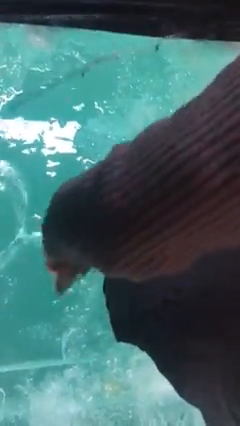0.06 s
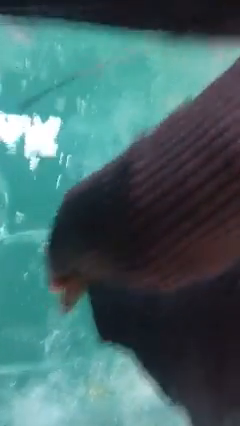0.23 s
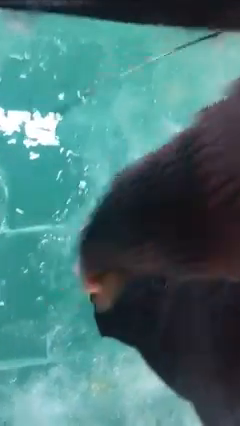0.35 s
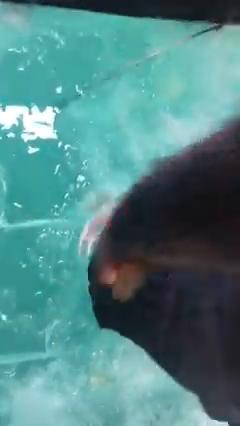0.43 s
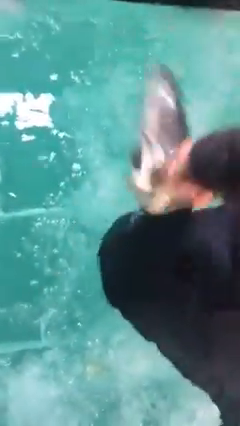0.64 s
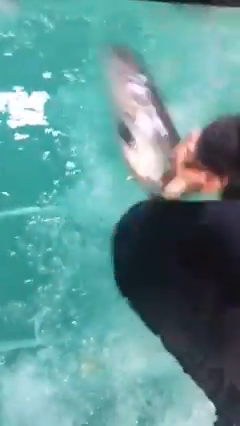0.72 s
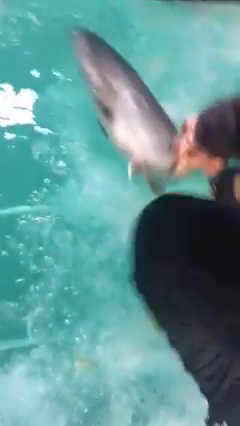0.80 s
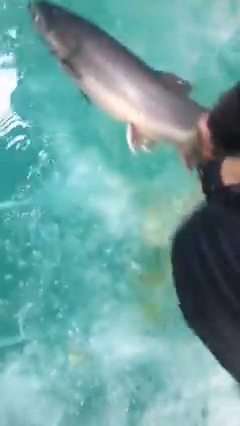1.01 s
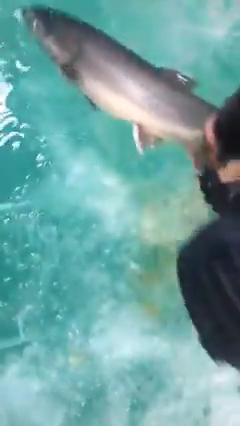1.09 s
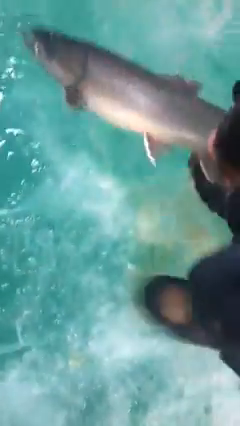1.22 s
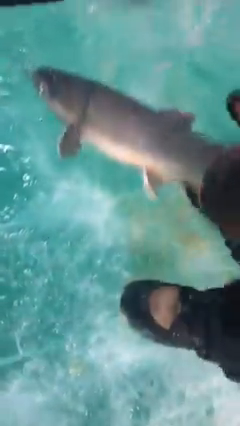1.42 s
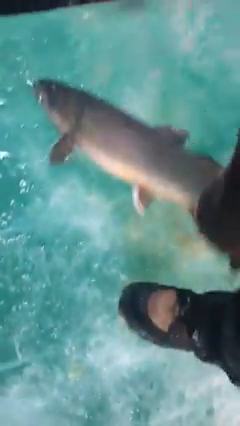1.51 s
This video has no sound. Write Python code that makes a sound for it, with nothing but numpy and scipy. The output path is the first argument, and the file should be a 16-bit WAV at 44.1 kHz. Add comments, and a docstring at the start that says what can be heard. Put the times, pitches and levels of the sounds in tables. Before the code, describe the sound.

A dead, wet thump of a fish laid on ice, amid soft clothing rustle.

```python
"""A fish is swung out and laid on lake ice, close by in the open air.
From the start, moving arms and legs give soft bumps and a dull rustle over faint hiss.
A quarter second in, after a tiny tick, comes one dead, low thump with a wet slap,
then a weaker knock and a short scuff, with no ring and no echo.
The body moves on, with more soft bumps, hollow rubs and thin swishes of fabric."""
import sys
import numpy as np
from scipy import signal
from scipy.fft import rfft, irfft
from scipy.io import wavfile
from scipy.ndimage import uniform_filter1d

SR = 44100
rng = np.random.default_rng(int(sys.argv[2]) if len(sys.argv) > 2 else 0)


def int16_out(signal):
    """Quantize to a 16-bit WAV file."""
    q = np.round(np.clip(np.atleast_2d(signal).T, -1, 1) * 32767)
    wavfile.write(sys.argv[1], SR, q.astype(np.int16))


N = 68355

# Tone of brushed cloth: freq_hz, level_db
CLOTH_COLOUR = [(50, -23), (150, 4), (300, 7), (800, 5.5), (1300, -3.5), (2200, -13), (3500, -35),
                (7000, -45)]


def amp(db):
    """Decibels to gain."""
    return 10 ** (np.asarray(db) / 20)


def unit(x):
    """Scales to rms 1."""
    return x / np.sqrt(np.mean(x ** 2) + 1e-20)


def eq_gain(colour, hz):
    """Gain of an EQ curve whose points are joined on a log-frequency axis."""
    freq_hz, level_db = np.transpose(colour)
    return amp(np.interp(np.log(hz + 1), np.log(freq_hz + 1), level_db))


def place(start_s, sound):
    """A silent track with the sound laid in at start_s."""
    track = np.zeros(N)
    part = track[round(start_s * SR):][:len(sound)]
    part += sound[:len(part)]
    return track


def noise(colour):
    """Noise of rms 1 with the given colour."""
    gain = eq_gain(colour, np.fft.rfftfreq(N, 1 / SR))
    return unit(irfft(rfft(rng.standard_normal(N)) * gain, N))


def fader(points):
    """Gain that rides through points of time and level."""
    return amp(np.interp(np.arange(N) / SR, *np.transpose(points)))


def swell(start_s, length_s, skew):
    """One smooth rise and fade; a skew below 1 makes the rise the faster."""
    progress = np.clip((np.arange(N) / SR - start_s) / length_s, 0, 1)
    return abs(np.sin(np.pi * progress ** skew))


def blow(colour, lag_s=0, lag_hz=150, size=4096):
    """One sharp push through a heavily damped body; lag_hz arrives lag_s late, lower waves later still."""
    hz = np.fft.fftfreq(size, 1 / SR)
    log_gain = np.log(eq_gain(colour, abs(hz)))
    log_response = np.conj(signal.hilbert(log_gain))  # minimum phase keeps the attack sharp
    dispersion = 4 * np.pi * lag_s * np.sign(hz) * np.sqrt(abs(hz) * lag_hz)
    return np.fft.ifft(np.exp(log_response - 1j * dispersion)).real[:size // 2]


def hiss():
    """A faint, steady bed of noise."""
    # Tone of the hiss: freq_hz, level_db
    colour = [(25, -33), (80, 1), (170, 11.5), (500, -1), (1000, -2), (2000, -4.5), (5000, -6.5),
              (9000, -13), (11500, -13), (15000, -6)]
    return amp(-72.5) * noise(colour)


def rustle():
    """Clothes shift on moving limbs with a dull, grainy rustle."""
    # Rise and fall of the rustle: time_s, level_db
    ride = [(0, -58), (.1, -70), (.25, -67), (.33, -63.5), (.42, -66.5), (.53, -66), (.57, -70),
            (.66, -65.5), (.73, -73), (.82, -67), (.9, -68), (1, -63.5), (1.11, -67), (1.22, -70),
            (1.26, -65), (1.38, -66), (1.55, -68)]
    # Tone of the rustle: freq_hz, level_db
    colour = [(30, -40), (70, -13), (160, 4.5), (350, 0), (550, -2.5), (900, -6.5), (1300, -13.5),
              (2400, -18), (4000, -25), (8000, -37)]
    grain_db, grain_s = 2, .006
    flicker = unit(uniform_filter1d(rng.standard_normal(N), int(grain_s * SR)))
    return fader(ride) * noise(colour) * amp(grain_db * flicker)


def swishes():
    """Sliding fabric gives thin, bright swells of noise."""
    # Rise and fall of the swish: time_s, level_db
    ride = [(0, -101), (.3, -83.5), (.46, -74), (.55, -80), (.75, -83.5), (.765, -71), (.79, -68.5),
            (.85, -77), (.95, -78.5), (1.06, -70.5), (1.11, -75.5), (1.158, -63), (1.2, -73.5),
            (1.232, -77.5), (1.242, -68.5), (1.28, -67.5), (1.32, -76.5), (1.55, -74)]
    # Tone of the swish: freq_hz, level_db
    colour = [(300, -7), (1200, 4), (2600, 2.5), (4500, -3.5), (8500, -8.5), (11500, 5), (15000, 2.5)]
    return fader(ride) * noise(colour)


def scuffs():
    """Cloth brushes past in short strokes."""
    # Strokes of cloth: start_s, length_s, level_db
    strokes = [(-.008, 0.054, -56.5), (0.042, 0.061, -64.5), (0.26, 0.035, -55), (0.285, 0.031, -52.5),
               (0.58, 0.012, -59), (1.011, 0.033, -64)]
    envelope = sum(amp(db) * swell(start_s, length_s, skew=.83) for start_s, length_s, db in strokes)
    return envelope * noise(CLOTH_COLOUR)


def rubs():
    """Sliding contact: friction noise through one broad resonance that glides along the stroke."""
    # Hollow rubs: start_s, length_s, level_db, first_hz, last_hz
    strokes = [(0.462, 0.14, -70.5, 855, 875), (0.581, 0.04, -62.5, 774, 760),
               (0.938, 0.053, -67, 420, 695), (1.142, 0.022, -77, 2680, 2600), (1.265, 0.03, -62, 290, 440),
               (1.264, 0.044, -71.5, 2460, 2270), (1.317, 0.032, -62.5, 456, 330)]
    resonance_q = 3.3
    out, t = np.zeros(N), np.arange(N) / SR
    for start_s, length_s, level_db, first_hz, last_hz in strokes:
        glide_hz = np.interp(t, (start_s, start_s + length_s), (first_hz, last_hz))
        carrier = np.exp(2j * np.pi * np.cumsum(glide_hz) / SR)
        width_hz = (first_hz + last_hz) / 2 / resonance_q
        pole = np.exp(-np.pi * width_hz / SR)
        # Shift down, low-pass, shift back: a band that follows the glide
        lowpassed = signal.lfilter([1], np.poly([pole, pole]), rng.standard_normal(N) / carrier)
        hollow = (carrier * lowpassed).real
        out += amp(level_db) * swell(start_s, length_s, skew=.74) * unit(hollow)
    return out


def bumps():
    """Each padded contact gives a few low cycles that drop in pitch, and a brush of cloth."""
    # Soft bumps of the moving body: start_s, level_db, pitch_hz, length_s, drop_octaves
    contacts = [(.003, -46.5, 160, 0.034, 0.2), (.0705, -47.5, 271, 0.0086, 1.95),
                (0.112, -47.5, 166, 0.015, 1.2), (0.131, -56, 188, 0.018, 0.65),
                (0.209, -43.5, 185, 0.012, 2), (.305, -47, 225, 0.014, 1.07), (0.487, -57, 224, .026, 0.32),
                (.533, -55.5, 157, 0.022, 0.32), (0.565, -55.5, 177, .014, 0.34),
                (.584, -46.5, 228, .014, 0.33), (0.651, -57.5, 224, .02, 0.59),
                (0.92, -49.5, 225, .017, 1.2), (1.023, -49.5, 190.7, .023, 0.53),
                (1.056, -50.5, 178, 0.024, 0.59), (1.097, -57, 175, 0.019, .4), (1.121, -55, 179, 0.014, 1),
                (1.146, -54.5, 167, 0.021, .4), (1.179, -59, 180, .011, .7),
                (1.217, -54.5, 162, 0.015, 0.51), (1.2392, -49.5, 278, 0.0073, 1.55),
                (1.247, -49, 212, 0.028, 0.16), (1.312, -49.5, 190, .013, 1.6),
                (1.403, -55, 187, 0.016, .4), (1.471, -48.5, 178, 0.015, 0.98),
                (1.533, -57, 175.5, 0.029, 0.35)]
    out, t = np.zeros(N), np.arange(N) / SR
    brush = amp(-27) * noise(CLOTH_COLOUR)
    for start_s, level_db, pitch_hz, length_s, drop_octaves in contacts:
        progress = np.clip((t - start_s) / length_s, 0, 1)
        falling_hz = pitch_hz * 2 ** (drop_octaves * (.5 - progress))
        cycles = np.cumsum((progress > 0) * falling_hz) / SR
        envelope = swell(start_s, length_s, skew=.72) ** 2
        out += amp(level_db) * envelope * (brush - np.sin(2 * np.pi * cycles))
    return out


def tick():
    """A tiny, dry tick just ahead of the thump."""
    # The tick: start_s, gain_db
    hits = [(0.2212, -25)]
    # Tone of the tick: freq_hz, level_db
    colour = [(100, -21), (700, -6), (2800, -5), (3600, -17), (4400, -36), (10000, -28)]
    return sum(place(start_s, amp(gain_db) * blow(colour)) for start_s, gain_db in hits)


def knock():
    """The weaker second hit: bending waves in the ice bring its bass in after the crack."""
    # Tone of the knock: freq_hz, level_db
    colour = [(20, -55), (50, -24), (110, -9), (290, 0.5), (500, -6), (900, -17), (1080, -10.5),
              (1350, -10), (1700, -31), (2100, -19.5), (3700, -41.5), (5500, -50), (9000, -53),
              (14000, -70)]
    return place(.2805, amp(5.5) * blow(colour, lag_s=.00083))


def low_thump():
    """One dead, heavily damped low thump with a few milliseconds of wet slap."""
    # Tone of the thump: freq_hz, level_db
    thump_colour = [(20, -68), (55, -40), (90, -16), (125, -5.5), (185, 0.5), (270, -1.5), (600, -10.5),
                    (790, -10.5), (1010, -22), (1200, -14.5), (1900, -20.5), (3000, -21), (3600, -32.5),
                    (4200, -34.5), (6800, -54), (7600, -76), (14000, -90)]
    # Tone of the wet slap: freq_hz, level_db
    slap_colour = [(200, -14), (900, -5), (2300, 10.5), (3500, -12), (5000, -23), (9000, -38)]
    thump_s = .2418
    thump = place(thump_s, -amp(17.8) * blow(thump_colour))  # pushes the opposite way to the knock
    slap = amp(-40.2) * swell(thump_s, length_s=.0057, skew=.4) * noise(slap_colour)
    return thump + slap


def scene():
    """Everything is close and dry, in one channel."""
    hits = tick() + low_thump() + knock()
    movement = bumps() + rubs() + rustle() + scuffs() + swishes()
    return (hits + movement + hiss())[None]


def record(dry):
    """A steep high cut takes off the very top."""
    cutoff_hz = 15400
    high_cut = signal.firwin(1023, cutoff_hz, window=("kaiser", 9), fs=SR)
    return signal.oaconvolve(dry, high_cut[None], "same")


dry = scene()
out = record(dry)
int16_out(out)
```